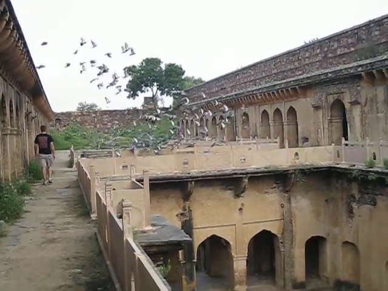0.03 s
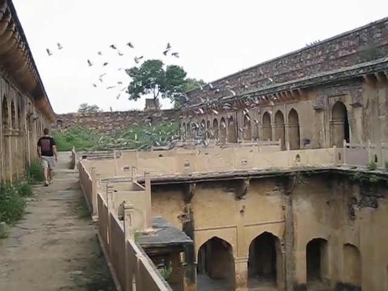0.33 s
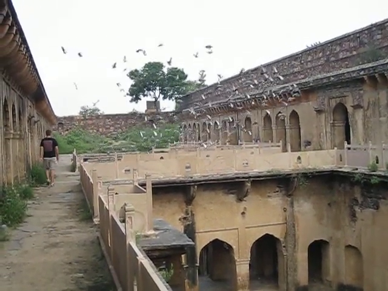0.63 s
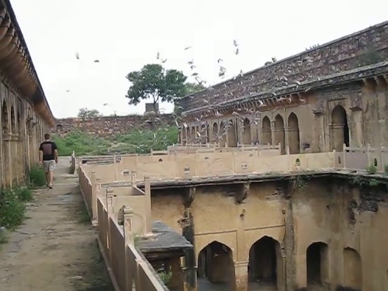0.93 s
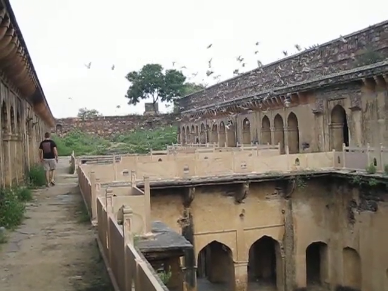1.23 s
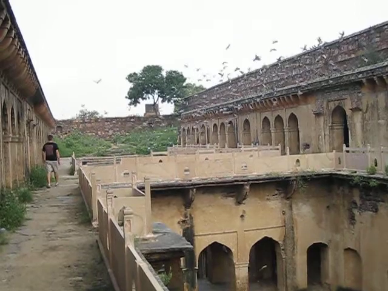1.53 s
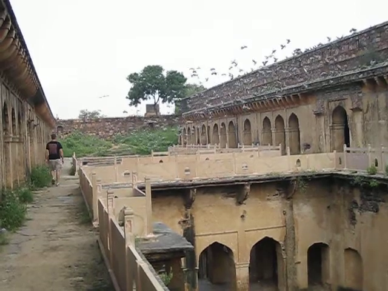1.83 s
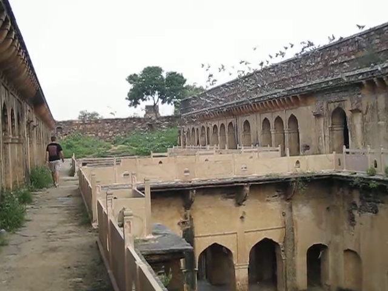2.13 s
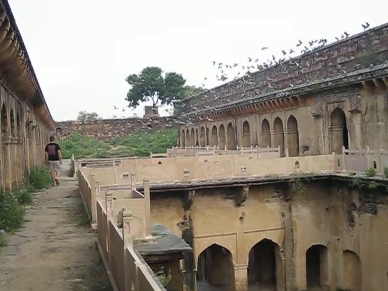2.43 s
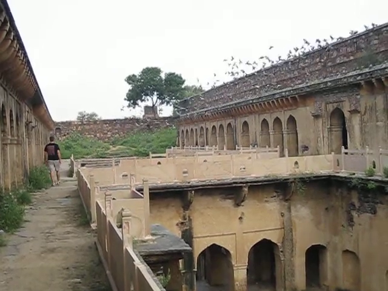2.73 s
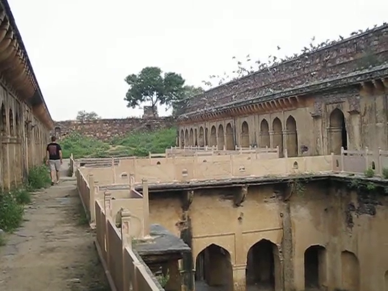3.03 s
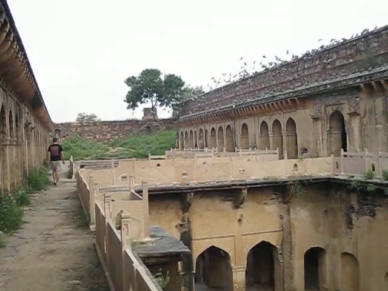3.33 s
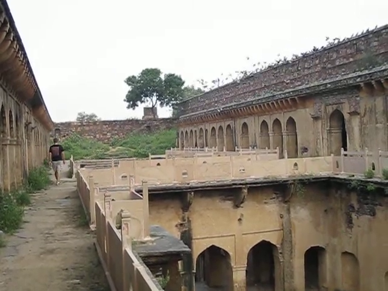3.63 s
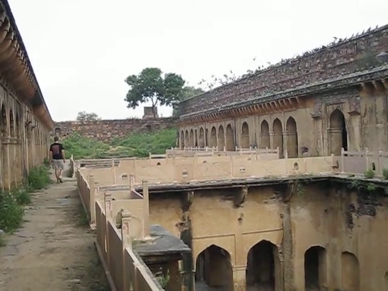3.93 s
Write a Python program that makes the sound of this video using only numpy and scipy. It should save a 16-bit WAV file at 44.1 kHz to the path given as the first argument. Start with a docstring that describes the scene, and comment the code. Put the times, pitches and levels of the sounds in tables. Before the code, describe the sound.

A bird close by screeches about four times a second, thin whistles breaking into lower, falling yelps. Pigeons flap across an echoing stone courtyard and settle as distant birds chatter, then everything grows quieter.

```python
"""A bird close to the microphone screeches about four times a second: thin whistles at first, then
breaking into lower, falling yelps. A flock of pigeons flaps across the stone courtyard and settles on
a roof, in a rush of feathers and wing claps. Farther off, one bird whistles and many more chatter over
still air and a faint hum; late on come a brief faint chirp and one dull knock. The walls ring, and the
gain control ducks under loud calls."""
import sys
import numpy as np
from scipy import signal
from scipy.fft import rfft, irfft, next_fast_len
from scipy.io import wavfile
from scipy.ndimage import uniform_filter1d, map_coordinates

SR = 44100
rng = np.random.default_rng(int(sys.argv[2]) if len(sys.argv) > 2 else 0)


def store_wav(level_fs):
    """Save 16-bit WAV to argv[1]."""
    pcm = np.round(np.clip(np.atleast_2d(level_fs), -1, 1) * 32767)
    wavfile.write(sys.argv[1], SR, pcm.T.astype(np.int16))


N = 176400
TOP_HZ = 15800  # upper limit of the birds' harmonics and of the microphone


def amp(db):
    """Decibels to gain."""
    return 10 ** (np.asarray(db) / 20)


def unit(x):
    """Scale to rms 1."""
    return x / np.sqrt(np.mean(x ** 2) + 1e-20)


def along(points, hz):
    """Interpolate (Hz, value) points on a log frequency axis."""
    freqs, values = np.transpose(points)
    return np.interp(np.log(np.abs(hz) + 1), np.log(freqs + 1), values)


def curves(rows):
    """One value per sample for each column after the time."""
    times, *columns = np.transpose(rows)
    return [np.interp(np.arange(N) / SR, times, column) for column in columns]


def wobble(rate, size):
    """A smooth random curve, rate knots a second."""
    knots = rng.standard_normal(size // 8 + 4)
    return map_coordinates(knots, [np.arange(size) * rate / SR], mode="wrap")


def filtered(x, response):
    """Filter x by a gain that is a function of frequency."""
    size = next_fast_len(N + SR // 2)
    return irfft(rfft(x, size) * response(np.fft.rfftfreq(size, 1 / SR)), size)[:N]


def coloured(x, points):
    """Filter x by a (Hz, dB) curve."""
    return filtered(x, lambda hz: amp(along(points, hz)))


def add(track, start_s, sound):
    """Mix a sound into the track."""
    i = int(round(start_s * SR))
    part = sound[max(-i, 0):max(N - i, 0)]
    track[max(i, 0):max(i, 0) + len(part)] += part


def bursts(rows, colour, decay_s):
    """Short dying puffs of coloured noise."""
    track, t = np.zeros(N), np.arange(SR // 10) / SR
    for start, db in rows:
        add(track, start, amp(db) * np.exp(-t / decay_s) * rng.standard_normal(len(t)))
    return coloured(track, colour)


# Stone walls all round the microphone. Each row: frequency in Hz, seconds to die away by 60 dB.
WALL_DECAY = [(300, 0.81), (2500, 0.65), (4000, 0.77), (9000, 0.72), (15000, 0.35)]
def courtyard(x, build_s=.042):
    """The diffuse echo of the walls builds up, then dies at its own rate in each band."""
    hz, t, noise = signal.stft(rng.standard_normal(SR), SR, nperseg=256)
    decay = amp(-60 * t / along(WALL_DECAY, hz)[:, None])
    tail = signal.istft(noise * decay, SR, nperseg=256)[1]
    tail *= 1 - np.exp(-np.arange(len(tail)) / SR / build_s)
    return signal.fftconvolve(x, tail / np.linalg.norm(tail))[:N]


def near_walls(sound, count=7, reach_s=.028, echo_db=-7.5):
    """A handful of early reflections doubles and frays a call."""
    taps = np.zeros(int(reach_s * SR) + 2)
    where, sign = rng.random((2, count))
    delays = ((.1 + .9 * where) * reach_s * SR).astype(int)
    taps[delays] = amp(echo_db) * np.sign(sign - .5) / np.sqrt(count)
    taps[0] = 1
    return signal.fftconvolve(sound, taps / np.linalg.norm(taps))


# The open air of the courtyard. Each row: frequency in Hz, relative level in dB.
AIR_SPECTRUM = [(15, -54), (25, -3), (65, -3.5), (173, -5.5), (261, -2), (408, -4.5), (501, -2),
                (546, -1.5), (1500, -9.5), (1950, -6), (3300, -120)]
def still_air():
    """A quiet, steady bed of low outdoor noise."""
    return amp(-47) * unit(coloured(rng.standard_normal(N), AIR_SPECTRUM))


# A hum deep in the background. Each row: frequency in Hz, level in dB.
HUM_TONES = [(75, -64.5), (177, -64)]
def hum():
    """Two faint low tones waver in phase."""
    t = np.arange(N) / SR
    return sum(amp(db) * unit(np.sin(2 * np.pi * hz * t + wobble(8, N))) for hz, db in HUM_TONES)


# A faint chirp, perhaps a distant call (first two rows), then one dull knock.
# Each row: start in seconds, relative level in dB.
CHIRP_AND_KNOCK = [(2.672, -24), (2.70, -23), (3.762, -22.5)]
# Their tone at the microphone. Each row: frequency in Hz, gain in dB.
CHIRP_AND_KNOCK_SPECTRUM = [(200, -31), (800, 3.5), (1300, -3), (2500, -15), (6000, -50)]
def chirp_and_knock():
    """Noise bursts near 1 kHz: a close pair makes the brief chirp, a lone one the knock."""
    return bursts(CHIRP_AND_KNOCK, CHIRP_AND_KNOCK_SPECTRUM, decay_s=.012)


def bird_note(pitch, throat, jitter_rate, shimmer_db, jitter=.021, fundamental_db=0):
    """One rough note: the pitch trembles, each harmonic flickers, and a rasp of air opens it."""
    n = len(pitch)
    t = np.arange(n) / SR
    unsteadiness = jitter + .05 * np.exp(-t / .012)  # shakiest at the onset
    tremble = unsteadiness * wobble(jitter_rate, n)
    wander = .01 * wobble(90, n)
    phase = 2 * np.pi * np.cumsum(pitch * (1 + tremble + wander)) / SR
    tone = np.zeros(n)
    for k in range(1, 8):
        db = along(throat, k * pitch) + fundamental_db * (k == 1) + 3 * wobble(90, n)
        tone += amp(db) * (k * pitch < TOP_HZ) * np.sin(k * phase)
    hz = np.fft.rfftfreq(n, 1 / SR)
    breath = irfft(rfft(rng.standard_normal(n)) * amp(along(throat, hz)) * (hz > pitch.min()), n)
    rasp = amp(-1.5) * np.exp(-t / .015) * unit(breath)
    shimmer = amp(shimmer_db * wobble(jitter_rate, n))
    attack, release = np.clip(t / .018, 0, 1), np.clip((t[-1] - t) / .022, 0, 1)
    return unit((unit(tone) + rasp) * shimmer) * attack * release


def yelp_pitch(length_s, hz, hold_s, fall_hz_per_s=11500, bend_s=.006):
    """The pitch holds, then bends into a steady fall of at most an octave."""
    t = np.arange(int(length_s * SR)) / SR
    falling_s = bend_s * np.logaddexp(0, (t - hold_s) / bend_s)
    return np.maximum(hz - fall_hz_per_s * falling_s, hz / 2)


def whistles(rows, throat):
    """Thin high notes that sag steadily and bounce off the nearby walls."""
    voice = np.zeros(N)
    for start, length, db, hz, fall in rows:
        pitch = hz - fall * np.arange(int(length * SR)) / SR
        whistle = bird_note(pitch, throat, jitter_rate=500, shimmer_db=3.5)
        add(voice, start, amp(db) * near_walls(whistle))
    return voice


# Birds far from the microphone. Each row: time in seconds, level in dB.
CHATTER_LEVELS = [(0, -26), (.8, -28), (1.5, -24.5), (2.2, -27), (2.9, -24), (3.12, -31), (3.28, -31),
                  (3.43, -37), (3.6, -32), (3.69, -42), (3.85, -36), (4, -52)]
# Their voices at that distance. Each row: frequency in Hz, relative level in dB.
CHATTER_THROAT = [(1400, -18.5), (2000, -11.5), (2500, -2.5), (2780, -32.5), (3250, -4.5), (3900, 5.5),
                  (4700, -15.5), (6000, -18.5), (9500, -21.5), (13000, -37), (16000, -42)]
def chatter(calls_per_s=40, centre_hz=2171, scatter_db=6.5):
    """Many far birds yelp at random, blurred by the walls."""
    calls = np.zeros(N)
    count = int(calls_per_s * N / SR)
    for i, (when, pitch, size, hold) in enumerate(rng.standard_normal((count, 4))):
        glide = yelp_pitch(.1, centre_hz * np.exp(.13 * pitch), hold_s=.035 + .02 * hold)
        yelp = bird_note(glide, CHATTER_THROAT, jitter_rate=900, shimmer_db=8.5, jitter=.0303)
        add(calls, (i + when) / calls_per_s - .05, amp(scatter_db * size) * yelp)
    level_db, = curves(CHATTER_LEVELS)
    return amp(level_db) * unit(amp(.5) * calls + courtyard(calls))


# One bird some way off. Each row: start in seconds, length in seconds, relative level in dB,
# pitch in Hz, fall in Hz per second.
FAR_BIRD_WHISTLES = [(-.02, .13, -21.5, 3733, 2184), (.07, .14, -20.5, 3480, 882),
                     (.27, 0.13, -19.5, 3430, 903), (.465, 0.169, -21, 3317, 800),
                     (.67, 0.18, -25, 3300, 398)]
# Its voice from there. Each row: frequency in Hz, relative level in dB.
FAR_BIRD_THROAT = [(3000, -6.5), (3500, -5), (6500, -16.5), (7300, -15.5), (10000, -23), (13400, -20.5),
                   (14300, -29), (16000, -42)]
def far_bird():
    """The opening whistles, with a larger share of echo than the near bird's."""
    voice = whistles(FAR_BIRD_WHISTLES, FAR_BIRD_THROAT)
    return amp(-2.5) * voice + amp(-7.5) * courtyard(voice)


# The flock crossing to the roof. Each row: time in seconds, swish level in dB, thump level in dB.
FLOCK_LEVELS = [(0, -22, -36), (.3, -20.5, -36.5), (.6, -22.5, -41.5), (1, -18, -42.5), (1.7, -24, -45),
                (2.4, -25, -51.5), (2.72, -28, -49.5), (3.1, -26, -49.5), (3.4, -39, -68),
                (3.7, -37.5, -55), (4, -37.5, -50)]
# Swish and thump as they reach the microphone. Each row: frequency in Hz, relative level in dB.
SWISH_SPECTRUM = [(1000, -58), (1500, -24), (2000, -9.5), (2500, -12.5), (2780, -9.5), (3300, 5.5),
                  (4100, -4), (5200, -5.5), (6800, -14), (9800, -16.5), (13300, -21), (15800, -36)]
THUMP_SPECTRUM = [(40, -4.5), (120, -10.5), (300, -2.5), (700, -1), (1200, -0.5), (2000, -15.5),
                  (4000, -59)]
def wingbeats(pigeons=36, beats_per_s=8, scatter_db=5, puff_s=.0054):
    """Each pigeon beats at its own rate; every beat is a swish of feathers and a soft thump."""
    energy, beats = np.zeros(N), np.arange(60)
    for offset, pace in rng.random((pigeons, 2)):
        rate = beats_per_s * (.75 + pace / 2)
        at = ((offset + beats + .05 * rng.standard_normal(len(beats))) / rate * SR).astype(int)
        size = amp(scatter_db * np.clip(rng.standard_normal(len(beats)), -2, 2))
        inside = (at >= 0) & (at < N)
        energy[at[inside]] += size[inside] ** 2
    decay = np.exp(-2 / (puff_s * SR))  # share of energy left after one sample
    puffs = np.sqrt(np.abs(signal.lfilter([1], [1, -decay], energy)))

    def layer(spectrum, wash_db):
        """Pulsing noise in a steady wash of the same colour."""
        flaps = coloured(puffs * rng.standard_normal(N), spectrum)
        wash = coloured(rng.standard_normal(N), spectrum)
        return unit(unit(flaps) + amp(wash_db) * unit(wash))
    swish_db, thump_db = curves(FLOCK_LEVELS)
    swish = amp(swish_db) * layer(SWISH_SPECTRUM, wash_db=2.5)
    thump = amp(thump_db) * layer(THUMP_SPECTRUM, wash_db=2)
    return swish + thump


# Claps that stand out of the flock. Each row: start in seconds, relative level in dB.
CLAP_HITS = [(.075, -20), (.277, -12), (.418, -14), (.572, -7), (.715, -16), (.84, -14.5), (1.1, -13),
             (2.218, -17), (2.334, -8), (2.673, -14), (2.745, -13), (2.8, -9)]
# Their tone at the microphone. Each row: frequency in Hz, gain in dB.
CLAP_SPECTRUM = [(800, -26), (2500, -11), (3800, 2), (6000, -9), (10000, -8), (14000, -14), (16000, -18)]
def wing_claps():
    """Wing tips meet with a sharp, bright snap."""
    return bursts(CLAP_HITS, CLAP_SPECTRUM, decay_s=.00068)


# The bird nearest the microphone, high register. Each row: start in seconds, length in seconds,
# level in dB, pitch in Hz, fall in Hz per second.
NEAR_WHISTLES = [(.885, 0.077, -15.5, 3780, 1530), (1.12, 0.073, -18.5, 3380, 800),
                 (1.345, 0.062, -12.5, 3383, 4570), (1.548, 0.066, -16.5, 3386, 1520),
                 (1.792, 0.084, -13, 3470, 5960), (2.02, 0.052, -17.5, 3330, 3000)]
# Its low register. Each row: start in seconds, length in seconds, level in dB, pitch in Hz,
# hold before the fall in seconds, extra gain of the fundamental in dB.
NEAR_YELPS = [(.67, 0.14, -24, 2515, 0.047, -9), (0.838, 0.03, -26, 2330, 0.0072, -11.5),
              (0.943, 0.1, -16.5, 2402, 0.0054, -4), (0.968, .05, -18, 2092, 0.0054, -2),
              (1.152, 0.091, -12.5, 2430, .016, 1), (1.377, 0.073, -15, 2300, 0.025, -0.5),
              (1.57, 0.099, -14.5, 2487, .016, -3.5), (1.826, 0.082, -12, 2310, 0.021, 0),
              (1.918, 0.048, -20, 1995, 0.011, 2), (2.024, 0.11, -15.5, 2456, .04, -0.5),
              (2.26, 0.11, -13.5, 2396, 0.041, -0.5), (2.496, 0.12, -14, 2558, 0.033, -0.5),
              (2.71, 0.09, -23.5, 2538, .02, -0.5), (2.743, 0.11, -14.5, 2486, 0.034, -3),
              (2.972, .116, -18, 2453, 0.049, 3), (3.267, 0.082, -36, 1900, .008, -8),
              (3.346, 0.058, -33.5, 1945, 0.0049, 5), (3.49, 0.071, -29.5, 2140, .01, 1.5),
              (3.552, 0.062, -38, 2383, 0.045, 0), (3.608, .06, -34.5, 1880, 0.0044, 5),
              (3.734, 0.075, -32.5, 2023, 0.016, -3), (3.82, 0.097, -41.5, 2200, 0.0092, 7)]
# Its throat in each register, from close by. Each row: frequency in Hz, relative level in dB.
NEAR_WHISTLE_THROAT = [(2800, 0), (3500, 1), (6600, -11), (10200, -12.5), (11300, -10.5), (13700, -26),
                       (16000, -30)]
NEAR_YELP_THROAT = [(1400, -15.5), (1900, -13.5), (2400, -4), (2800, 0.5), (3400, 5), (4400, 3), (5400, -7),
                    (7200, -19.5), (9200, -9.5), (11700, -15), (12600, -23), (14300, -30), (16000, -44)]
def near_bird(loud_db=-19.5, dull_from_hz=3600):
    """Whistles break into yelps and the courtyard answers; soft yelps are duller."""
    voice = whistles(NEAR_WHISTLES, NEAR_WHISTLE_THROAT)
    for start, length, db, hz, hold, fundamental_db in NEAR_YELPS:
        tilt = .4 * min(db - loud_db, 0)  # dB per octave in the treble
        throat = [(f, level + tilt * max(np.log2(f / dull_from_hz), 0)) for f, level in NEAR_YELP_THROAT]
        pitch = yelp_pitch(length, hz, hold)
        yelp = bird_note(pitch, throat, jitter_rate=600, shimmer_db=3, fundamental_db=fundamental_db)
        add(voice, start, amp(db) * near_walls(yelp))
    return voice + amp(-7.5) * courtyard(voice)


def scene():
    """Birds, wings and still air, heard from one spot in the courtyard."""
    background = still_air() + hum()
    brief_sounds = wing_claps() + chirp_and_knock()
    return (near_bird() + far_bird() + chatter() + wingbeats() + brief_sounds + background)[None]


def record(dry):
    """The microphone has a narrow notch; gain control ducks fast and recovers steadily; the top is cut."""
    notch_hz, notch_width_hz = 7900, 650
    limit_db, recover_db_per_s, sense_s = -19.5, 62.5, .013
    mic = filtered(dry[0], lambda hz: np.abs(hz - notch_hz) / np.hypot(hz - notch_hz, notch_width_hz))
    power = np.abs(uniform_filter1d(mic ** 2, int(sense_s * SR)))
    excess_db = np.maximum(10 * np.log10(power + 1e-12) - limit_db, 0)
    recovery_db = recover_db_per_s * np.arange(N) / SR
    duck_db = np.maximum.accumulate(.86 * excess_db + recovery_db) - recovery_db
    return filtered(mic * amp(-duck_db), lambda hz: hz < TOP_HZ)[None]


dry = scene()
out = record(dry)
store_wav(out)
```